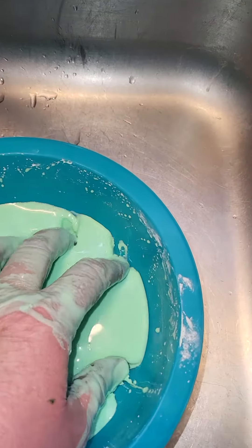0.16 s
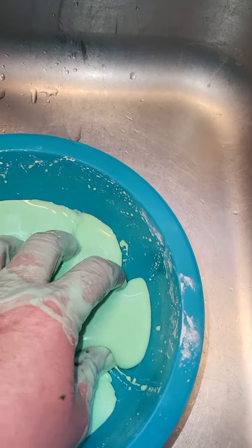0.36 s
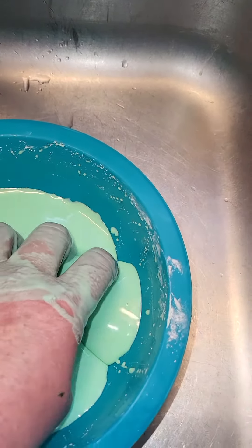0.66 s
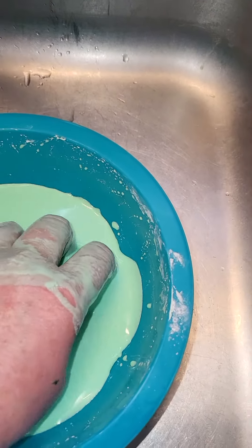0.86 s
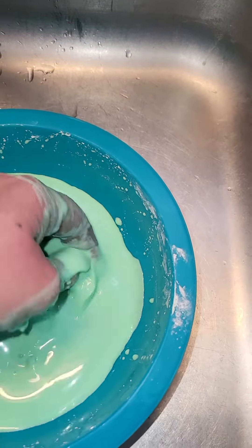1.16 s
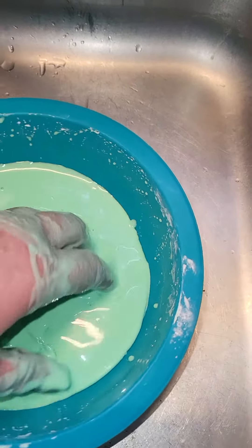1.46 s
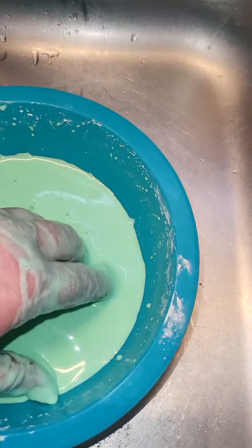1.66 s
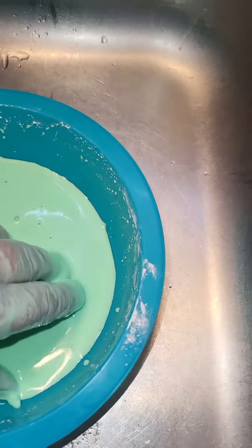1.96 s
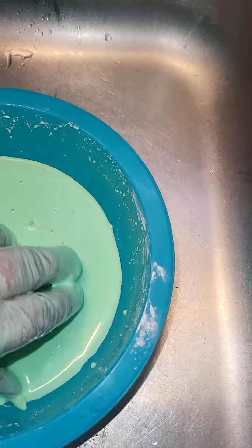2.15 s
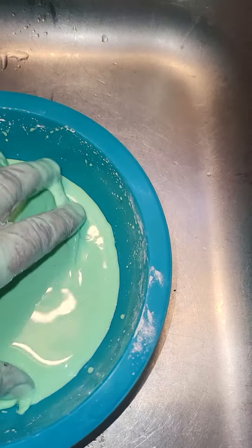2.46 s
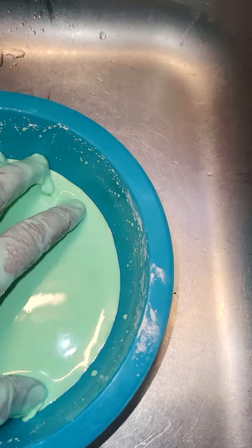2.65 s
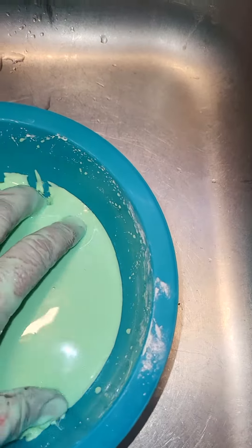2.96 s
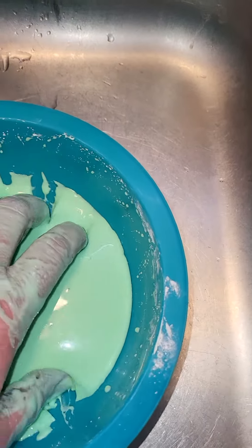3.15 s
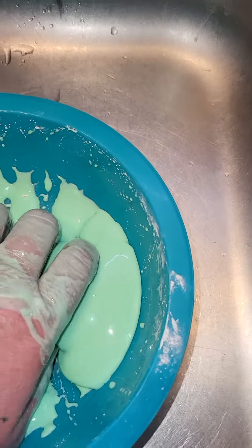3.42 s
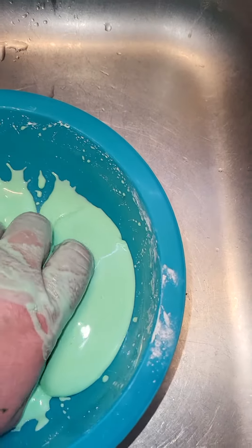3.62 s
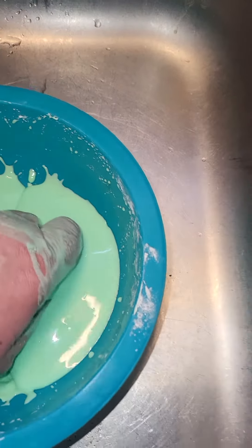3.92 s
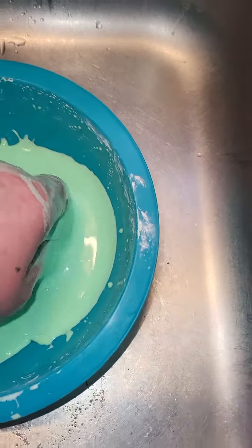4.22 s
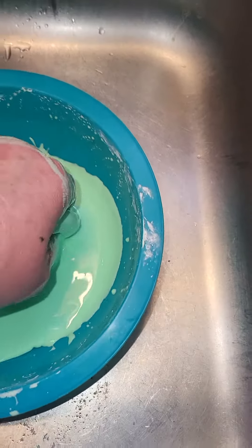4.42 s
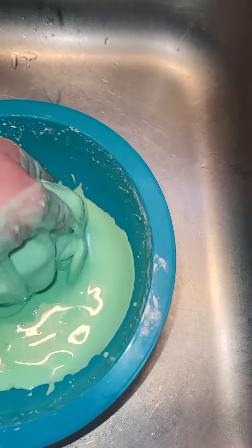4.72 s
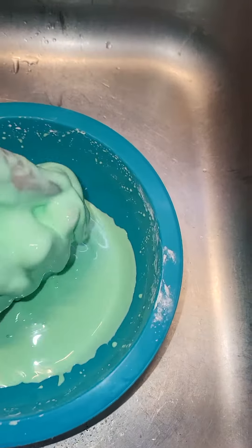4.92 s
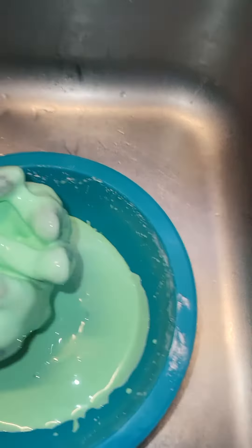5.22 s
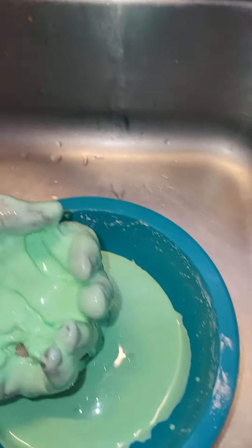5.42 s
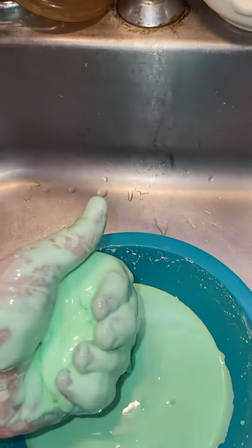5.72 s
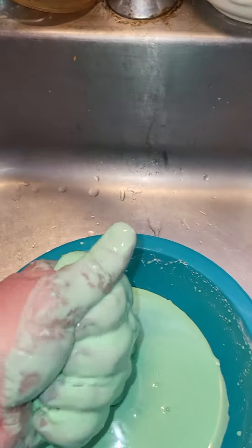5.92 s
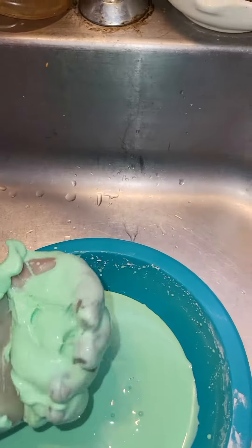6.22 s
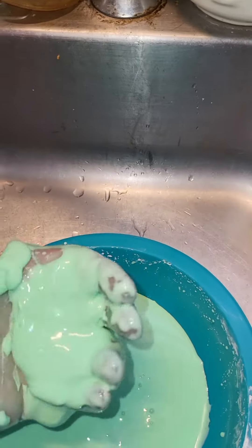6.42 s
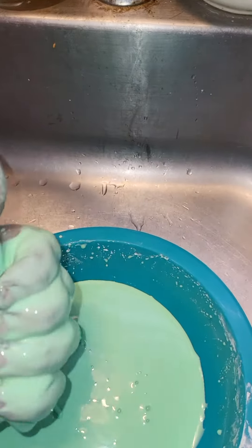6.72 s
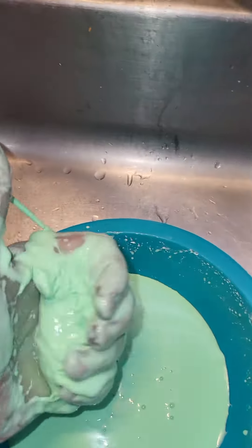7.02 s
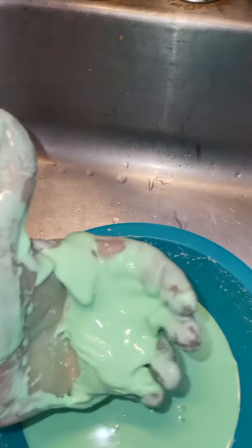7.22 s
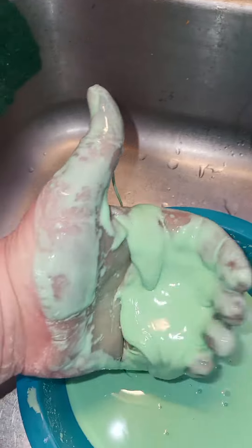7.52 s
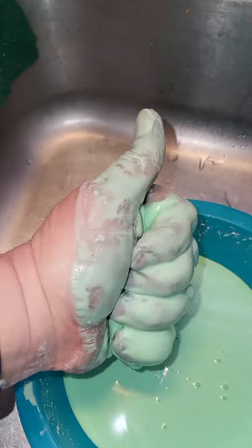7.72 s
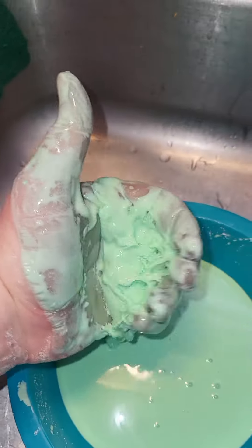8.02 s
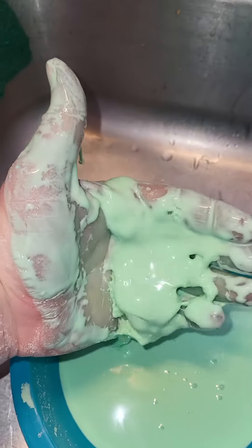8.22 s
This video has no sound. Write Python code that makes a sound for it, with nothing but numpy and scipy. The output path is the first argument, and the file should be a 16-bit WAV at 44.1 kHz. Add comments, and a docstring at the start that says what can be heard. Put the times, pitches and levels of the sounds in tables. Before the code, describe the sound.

Close up in a steel kitchen sink, fingers drag through thick starch slurry with a soft gritty scrape. The plastic bowl slips and gives dull thuds, then knocks against the sink in a loud, quick clatter about halfway through. Afterwards a handful is squeezed and released with faint fizzing, sticky ticks and small wet pops. A low appliance hum runs underneath.

```python
"""A gritty scrape and a soft thud, close up: a hand works cornstarch slurry in a plastic bowl that
stands in a steel kitchen sink. Fingers grind through the packed starch; the bowl judders, thuds and
knocks on the sink floor. Then a lifted handful is squeezed and let go, fizzing and popping as its air
pockets burst. Two microphones at the sink hear the steel walls, the kitchen and a low appliance hum."""
import sys
import numpy as np
from scipy import signal
from scipy.fft import rfft, irfft
from scipy.io import wavfile
from scipy.ndimage import uniform_filter1d, minimum_filter1d, map_coordinates

SR = 44100
rng = np.random.default_rng(int(sys.argv[2]) if len(sys.argv) > 2 else 0)


def dump_mix(stems):
    """Bounce the given channels to the path in sys.argv[1] as a 16-bit WAV at rate SR."""
    frames = np.atleast_2d(stems).T  # one column per channel
    limited = np.clip(frames, -1, 1)  # hard clip at full scale
    pcm = np.round(limited * 32767).astype(np.int16)
    wavfile.write(sys.argv[1], SR, pcm)


N = 369116
TIME = np.arange(N) / SR
TAIL = 16384  # samples for one short sound and its echoes

# finger strokes through the starch: (start [s], firmest moment [s], end [s], relative level [dB])
FINGER_STROKES = [(-.05, 0.89, 1.195, -52), (1.334, 1.386, 1.617, -49.5), (1.831, 2.037, 2.25, -65.5),
                  (2.61, 3.28, 4.31, -51.5)]
# starch giving way: (middle [s], relative level [dB], furrow pitch [Hz], half length [s])
STARCH_SPURTS = [(.005, -36, 2580, 0.018), (0.455, -50.5, 1540, 0.017), (0.599, -51, 1800, 0.018),
                 (0.865, -52.5, 3100, 0.075), (1.407, -51.5, 4200, 0.017), (1.525, -47, 3700, 0.011),
                 (2.698, -52, 3600, 0.023), (3.19, -52, 1370, 0.079), (3.93, -51, 4300, 0.065)]
# hollows in the bowl and between the fingers: (frequency [Hz], gain [dB])
HAND_HOLLOWS = [(690, 7), (990, 4.5), (1380, 5.5), (2560, 1.5), (3300, -4.5), (5500, -7.5)]
# bowl knocking on the sink: (time [s], level [dB], contact brightness [Hz])
BOWL_KNOCKS = [(.017, -33, 7400), (1.685, -37, 525), (2.002, -34, 423), (3.437, -31, 656),
               (4.1229, -20, 2840), (4.146, -24, 1560), (4.219, -25, 2870), (4.792, -24.5, 1820),
               (4.843, -5.5, 5750), (4.867, -10, 4400), (4.893, -11, 4940), (4.917, -18.5, 1850),
               (4.946, -24.5, 2660), (4.964, -24, 1920), (4.981, -20.5, 4100), (5.009, -29, 4000)]
# bowl rocking on the springy sink floor, pitched by the hand's load: (time [s], level [dB], pitch [Hz])
BOWL_THUDS = [(.001, -28.5, 81.6), (1.109, -30.5, 92), (1.387, -36.5, 88), (1.412, -27, 125),
              (1.686, -18, 171.5), (1.682, -25.5, 99.5), (2.005, -19, 109.2), (2.112, -20, 78),
              (2.504, -35.5, 92.7), (2.685, -30.5, 112), (3.431, -32, 146), (3.987, -28, 108.6),
              (4.041, -28.5, 89.4), (4.127, -14, 81.8), (4.236, -14, 102), (4.616, -35, 96),
              (4.803, -16, 88), (4.846, -10.5, 80.4), (4.865, -3, 111.3), (4.895, -5.5, 76),
              (4.983, -13, 92.6)]
# bowl slipping in short jerks: (time [s], relative level [dB])
BOWL_SLIPS = [(0.166, -40), (0.201, -38), (.241, -40.5), (0.269, -37), (.279, -42), (.345, -39),
              (.357, -23.5), (0.399, -38), (3.177, -38.5), (3.208, -40)]
# modes of the loaded plastic bowl: (frequency [Hz], level [dB], t60 [s])
BOWL_MODES = [(286, -2.5, 0.062), (625, -11.5, 0.035), (1380, 4.5, 0.0058), (2000, -1.5, 0.0091)]
# modes of the steel sink: (frequency [Hz], level [dB])
SINK_MODES = [(178, 3), (218, -5.5), (373, -4), (488, -7), (575, -8), (673, -8), (917, -11), (1297, -16.5),
              (1450, -18.5), (2220, -21), (2690, -17.5)]
# fingers closing and opening: (middle [s], half length [s], ooze [dB], gap pitch [Hz], fizz [dB])
HAND_SQUEEZES = [(1.049, 0.048, -65, 1480, -51), (3.28, 0.081, -74, 1360, -47),
                 (3.64, 0.049, -55, 2430, -55), (6.135, 0.075, -69, 1670, -49.5),
                 (6.875, 0.092, -61, 660, -66), (7.075, 0.11, -68, 1740, -49),
                 (8.017, 0.1, -69, 1741, -52.5)]
# air pockets bursting: (time [s], cavity level [dB], relative film level [dB])
AIR_POPS = [(1.085, -43, -51), (1.0957, -27, -30.5), (1.2482, -47, -60), (5.968, -45.5, -53),
            (6.121, -58, -41), (6.1521, -42, -31.5), (6.157, -42.5, -35.5), (6.218, -56.5, -46.5),
            (6.299, -46, -44.5), (6.767, -29, -57), (7.0774, -35, -35.5), (7.169, -53, -44),
            (7.7888, -50, -61), (7.9404, -40.5, -61), (7.968, -43.5, -46)]
# threads of slurry snapping: (time [s], level [dB])
THREAD_SNAPS = [(1.3765, -26.5), (2.235, -47), (2.7853, -41), (3.241, -40), (3.349, -41.5), (3.779, -48),
                (3.8287, -41), (3.858, -45), (3.932, -30), (4.064, -44.5), (4.421, -45.5), (5.293, -47.5),
                (5.322, -41), (6.09, -46), (6.9708, -40.5), (7.2259, -46.5), (7.617, -48), (7.977, -40),
                (8.069, -45.5), (8.173, -48.5)]
# tone of each source at the microphones: (frequency [Hz], gain [dB])
SCRAPE_TONE = [(200, -3), (850, -6.5), (1900, -5), (3200, -4.5), (6000, -2.5), (9500, -16.5), (12500, -14),
               (15500, -12.5)]
RUMBLE_TONE = [(30, -35), (55, 0.5), (180, -7), (320, -16), (2000, -47.5)]
KNOCK_TONE = [(90, -2), (230, 6), (300, -2), (400, 2.5), (620, 5), (780, -5.5), (1300, -3), (1850, -10.5),
              (2500, -9), (3400, -12), (5800, -8), (9500, -22), (15000, -3.5)]
POP_TONE = [(700, -20), (2500, -12), (4200, 2.5), (7500, 6), (10500, -7.5), (14000, -7)]
FIZZ_TONE = [(2000, -22), (6000, -1.5), (10000, -7), (14000, 5.5)]
HUM_TONE = [(30, -34), (55, 2), (140, -8), (190, 1.5), (320, -15.5), (520, -12.5), (950, -35),
            (2000, -39.5), (2650, -31.5), (3200, -40), (7500, -37), (10500, -53.5), (15500, -34)]
# balance of the two microphone ports: (frequency [Hz], left minus right [dB])
MIC_BALANCE = [(150, 1), (330, -3), (650, -3.5), (1000, 7), (1400, 5.5), (2300, -2.5), (6000, -2.5),
               (9000, 1.5), (13000, -10)]


def dragging(scrape_db=2, spurt_db=1, furrow_db=-2, furrow_span=1.28, rumble_db=-22, rumble_power=0.45):
    """Close up, jammed starch grinds under the fingers and gives in spurts; the pull shakes the bowl."""
    pull = sum(stroke(*row) for row in FINGER_STROKES)
    grit = grains(rate=3500, spread_db=2) * undb(2 * walk(60))
    grind = hollowed(in_sink(grit, SCRAPE_TONE))
    out = undb(scrape_db) * pull * grind
    for s, db, hz, half in STARCH_SPURTS:
        now = np.abs(TIME - s) < 3 * half
        swell = undb(db + spurt_db) * np.exp(-((TIME[now] - s) / half) ** 2)
        furrow = unit(band(grind[:, now], [hz / furrow_span, hz * furrow_span], "band"))
        out[:, now] += swell * unit(grind[:, now] + undb(furrow_db) * furrow)
    shake = unit(colour(diffuse(N), RUMBLE_TONE) * undb(3 * walk(25)))
    return out + undb(rumble_db) * pull ** rumble_power * shake


def stroke(start, firmest, end, db, bite_s=0.1, firm_up_db=2.5, ease_off_db=8.5, let_go_t60=0.79):
    """Force of one finger stroke: it bites, firms up, eases off and lets go."""
    effort = undb(db - np.interp(TIME, [start, firmest, end], [firm_up_db, 0, ease_off_db]))
    bite = np.clip((TIME - start) / bite_s, 0, 1)
    return effort * bite * fade(np.maximum(TIME - end, 0), let_go_t60)


def hollowed(x, shift_db=3, span=1.045, drift=.015):
    """Grains heard through the hollows of bowl and hand, which open and close by chance."""
    hollows = sum(undb(db + shift_db * walk(7.3)) * band(x, [hz / span, hz * span], "band")
                  for hz, db in HAND_HOLLOWS)
    return unit(x + bend(hollows, 1 + drift * walk(6)))


def knocks(ring_db=-4, ring_t60=0.36, wall_db=-8, wall_t60=0.047, damped_hz=9000, detune=0.0033):
    """The bowl's base hits the sink: a clack, the hollow note of its wall and the ring of the steel."""
    out, t = np.zeros((2, N)), TIME[:TAIL]
    # every blow shares the sink's echoes and has some of its own
    shared, *own = (basin(direct_db=0, walls_t60=.036, room_db=-14, room_t60=.36)
                    for _ in range(len(BOWL_KNOCKS) + 1))
    for (s, db, bright_hz), paths in zip(BOWL_KNOCKS, own):
        wall_hz = 660 * (bright_hz / 1000) ** 0.4  # a harder contact wakes a higher resonance
        wall = np.sin(2 * np.pi * wall_hz * t) * fade(t, wall_t60)
        contacts = chatter(after_db=-12.5, after_s=0.012, count=8)
        clack = colour(echoed(contacts, shared + undb(1) * paths), KNOCK_TONE)
        # the bowl damps the sink's higher modes, and its shifting load detunes them for every blow
        ring = sum(undb(mode_db) * mode(hz, ring_t60 / (1 + hz / damped_hz), detune)
                   for hz, mode_db in SINK_MODES)
        clack, ring = (strength(band(part, bright_hz, "low")) for part in (clack, ring))
        add(out, s, undb(db) * (clack + undb(ring_db) * ring + undb(wall_db) * strength(wall)))
    return out


def thuds(overtone_db=-15, overtone_ratio=2.3, swell_cycles=1.02, shudder_db=-11, shudder_hz=300):
    """The heavy bowl bounces on the sink floor, damped by the slurry, and the basin shudders."""
    out, t = np.zeros((2, N)), TIME[:TAIL]
    for s, db, hz in BOWL_THUDS:
        phase, rise = 2 * np.pi * hz * t, t * hz / swell_cycles
        tone = np.sin(phase) + undb(overtone_db) * np.sin(overtone_ratio * phase)
        bounce = rise * np.exp(1 - rise) * tone
        rumble = unit(band(band(diffuse(TAIL)[0], shudder_hz, "low"), shudder_hz, "low"))
        shudder = rumble * fade(t, t60=0.18) * np.minimum(rise, 1)
        add(out, s, undb(db) * (bounce + undb(shudder_db) * shudder))
    return out


def slips(gain_db=2, detune=0.019, echo_db=-4, soft_hz=2900):
    """The pushed bowl sticks and lets go; each jerk stutters and gives a round tock in the plastic."""
    out = np.zeros((2, N))
    for s, db in BOWL_SLIPS:
        plastic = sum(undb(mode_db) * mode(hz, t60, detune) for hz, mode_db, t60 in BOWL_MODES)
        tock = echoed(chatter(after_db=-11, after_s=.0015, count=5), band(plastic, soft_hz, "low"))
        echoes = echoed(tock[0], basin(direct_db=0, walls_t60=.045, room_db=-10, room_t60=.3))
        add(out, s, undb(db + gain_db) * (strength(tock) + undb(echo_db) * strength(echoes)))
    return out


def squeezing(gap_span=1.32, paste_db=-6, glide_octaves=0.11):
    """Slurry oozes through narrowing finger gaps, rising in pitch; tiny cells burst in its skin."""
    paste = in_sink(grains(rate=7300, spread_db=1), SCRAPE_TONE)
    cells = in_sink(grains(rate=2200, spread_db=3.5) * undb(3 * walk(110)), FIZZ_TONE)
    out = np.zeros((2, N))
    for s, half, ooze_db, hz, fizz_db in HAND_SQUEEZES:
        now = np.abs(TIME - s) < 3 * half
        progress, edges = (TIME[now] - s) / half, [hz / gap_span, hz * gap_span]
        gap = band(band(paste[:, now], edges, "band"), edges, "band")
        ooze = unit(bend(gap, 2 ** (glide_octaves * progress))) + undb(paste_db) * paste[:, now]
        out[:, now] += np.exp(-progress ** 2) * undb(ooze_db) * ooze
        out[:, now] += np.exp(-progress ** 4) * undb(fizz_db) * cells[:, now]
    return out


def pops(film_gain_db=3, longest_tear_t60=0.00156, db_per_doubling=12):
    """A wet film snaps and crackles over an air pocket, which rings; the biggest tear for longer."""
    out, t = np.zeros((2, N)), TIME[:TAIL]
    biggest_db = max(row[1] for row in AIR_POPS)
    for s, cavity_db, film_db in AIR_POPS:
        tear_t60 = longest_tear_t60 * 2 ** ((cavity_db - biggest_db) / db_per_doubling)
        tear = rng.standard_normal(TAIL) * fade(t, tear_t60)
        echoes = basin(direct_db=4, walls_t60=0.06, room_db=-15, room_t60=0.4)
        cavity = strength(colour(echoed(tear, echoes), POP_TONE))
        crackle = chatter(after_db=-1, after_s=0.0015, count=5)
        film = strength(colour(echoed(crackle, echoes), FIZZ_TONE))
        add(out, s, undb(cavity_db) * cavity + undb(film_db + film_gain_db) * film)
    return out


def threads(stray_db=-76):
    """Sticky threads stretch and snap on the wet hand: close, dry ticks, the tiniest at random."""
    out = undb(stray_db) * in_sink(grains(rate=25, spread_db=5.5), FIZZ_TONE)
    for s, db in THREAD_SNAPS:
        echoes = basin(direct_db=9, walls_t60=0.05, room_db=-13, room_t60=0.4)
        add(out, s, undb(db) * strength(colour(echoes, FIZZ_TONE)))
    return out


def basin(direct_db, walls_t60, room_db, room_t60):
    """Paths to the microphones: direct sound, a flurry from the near steel walls, the kitchen's tail."""
    stages = (direct_db, .009), (0, walls_t60), (room_db, room_t60)
    power = sum((undb(db) * strength(fade(TIME[:TAIL], t60))) ** 2 for db, t60 in stages)
    spectrum = rfft(diffuse(TAIL) * np.sqrt(power), 2 * TAIL)
    # the many paths ripple the spectrum finely but favour no broad band
    broad = np.sqrt(uniform_filter1d(np.abs(spectrum) ** 2, size=500, axis=1))
    return strength(irfft(spectrum / broad)[:, :TAIL])


def in_sink(x, tone, echo_db=-9, echo_t60=.3):
    """A coloured stream of grains up close, with the faint ring of the sink behind it."""
    t = TIME[:SR // 4]
    echoes = rng.standard_normal((2, len(t))) * fade(t, echo_t60)
    wet = signal.fftconvolve(x, echoes, axes=1)[:, :N]
    return unit(colour(unit(x) + undb(echo_db) * unit(wet), tone))


def hum(level_db=-51.5):
    """Room tone: the steady low rush of an appliance running farther off in the kitchen."""
    return undb(level_db) * unit(colour(diffuse(N), HUM_TONE))


def diffuse(size, apart_hz=480):
    """Noise at two microphones: long waves reach both alike, short ones do not."""
    common, left, right = rng.standard_normal((3, size))
    return band(common, apart_hz, "low") + band(np.array([left, right]), apart_hz, "high")


def mode(hz, t60, detune, apart_hz=700):
    """A fading mode, detuned by chance; the higher it is, the more the microphones differ in phase."""
    t = TIME[:TAIL]
    hz = hz * (1 + detune * rng.standard_normal())
    phase = min(hz / apart_hz, 1.5) ** 2 * rng.uniform(-1, 1, (2, 1))
    return np.sin(2 * np.pi * hz * t + phase) * fade(t, t60)


def grains(rate, spread_db):
    """Tiny random clicks, rate per second, a few larger; scattered differently to each microphone."""
    hit = rng.random((2, N)) < rate / SR
    size = undb(spread_db * np.minimum(rng.exponential(size=(2, N)), 4))
    return unit(hit * size * rng.choice([-1, 1], (2, N)))


def chatter(after_db, after_s, count):
    """A contact followed by a few smaller ones at random moments."""
    train = np.zeros(TAIL)
    lag = np.minimum(rng.exponential(after_s, count), .2)
    sizes = undb(after_db) * rng.standard_normal(count) * np.exp(-lag / after_s / 2)
    train[(lag * SR).astype(int)] = sizes
    train[0] = 1
    return train


def walk(rate):
    """Random wandering through rate points per second, with a spread near 1."""
    knots = rng.standard_normal(4096)
    return np.interp(TIME * rate, np.arange(len(knots)), knots)


def echoed(x, echoes):
    """A short sound heard through an echo pattern."""
    return signal.fftconvolve(echoes, x[None], axes=1)[:, :TAIL]


def bend(x, ratio):
    """Shift a sound's pitch by a changing ratio."""
    place = np.cumsum(ratio)
    return np.array([map_coordinates(side, [place], order=1, mode="mirror") for side in x])


def colour(x, points, power=1, size=4096):
    """Causal filter whose gain follows (frequency [Hz], gain [dB]) points, raised to a power."""
    hz, db = np.transpose(points)
    bins = np.maximum(np.fft.rfftfreq(size, 1 / SR), 1)
    gain = undb(power * np.interp(np.log(bins), np.log(hz), db))
    cepstrum = irfft(np.log(gain))
    cepstrum[1:size // 2] *= 2  # fold onto positive time for minimum phase
    cepstrum[size // 2 + 1:] = 0
    response = irfft(np.exp(rfft(cepstrum)))
    return signal.fftconvolve(np.atleast_2d(x), response[None], axes=1)[:, :x.shape[-1]]


def band(x, hz, kind):
    """Second-order low-, high- or band-pass."""
    return signal.sosfilt(signal.butter(1 if kind == "band" else 2, hz, kind, fs=SR, output="sos"), x)


def fade(t, t60):
    """Decay by 60 dB in t60 seconds, 1 ms at the shortest."""
    return np.exp(-np.log(1000) * t / max(t60, 1e-3))


def undb(db):
    """Decibels to gain."""
    return 10 ** (np.asarray(db) / 20)


def unit(x):
    """Scale to rms 1."""
    return x / np.sqrt(np.mean(x ** 2))


def strength(x):
    """Scale a short sound to the energy of 5 ms at rms 1."""
    energy = np.sum(np.mean(np.atleast_2d(x) ** 2, axis=0))
    return x / np.sqrt(energy / (.005 * SR))


def add(out, s, x):
    """Mix x in at time s."""
    start = int(s * SR)
    out[:, start:start + x.shape[-1]] += x[..., :N - start]


def limiter(x, ceiling_db=-9.0, sense_s=0.0089, hold_s=1.0, release_s=0.32):
    """A burst over the ceiling turns the gain down at once; it holds, then comes back."""
    hold, release = int(hold_s * SR), int(release_s * SR)
    power = uniform_filter1d(np.mean(x ** 2, axis=0), int(sense_s * SR))
    allowed = 1 / np.sqrt(np.maximum(power / undb(ceiling_db) ** 2, 1))
    held = minimum_filter1d(allowed, hold, origin=(hold - 1) // 2)
    gain = np.minimum(held, uniform_filter1d(held, release, origin=(release - 1) // 2))
    return np.clip(x * gain, -1, 1)


def scene():
    """At the sink: bowl and slurry close by, the kitchen behind."""
    return knocks() + slips() + thuds() + pops() + threads() + dragging() + squeezing() + hum()


def record(dry, bass_cut_hz=36, top_hz=16000):
    """Each microphone port colours its side; then come a bass cut, the limiter and a steep top cut."""
    ports = np.vstack([colour(dry[0], MIC_BALANCE, .5), colour(dry[1], MIC_BALANCE, -.5)])
    ports = limiter(band(band(ports, bass_cut_hz, "high"), bass_cut_hz, "high"))
    return signal.sosfilt(signal.ellip(10, .2, 80, top_hz, fs=SR, output="sos"), ports)


dry = scene()
out = record(dry)
dump_mix(out)
```